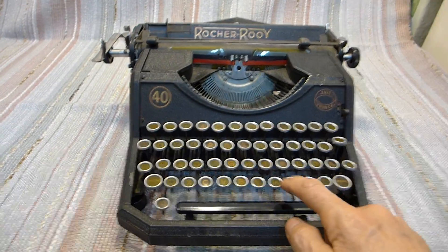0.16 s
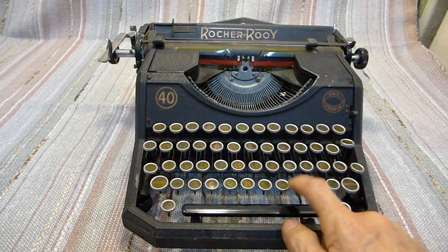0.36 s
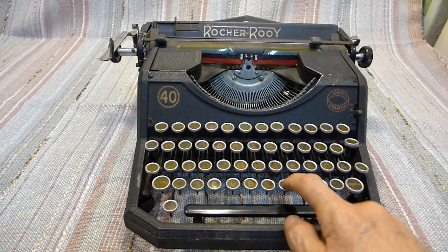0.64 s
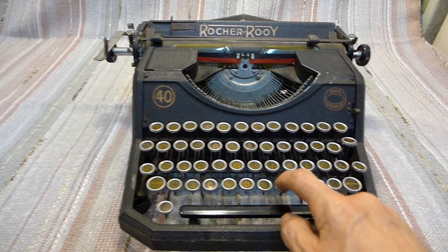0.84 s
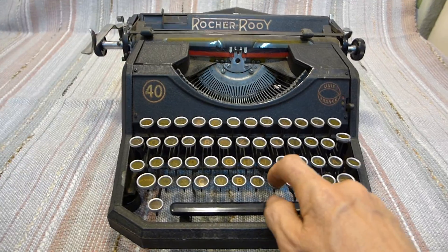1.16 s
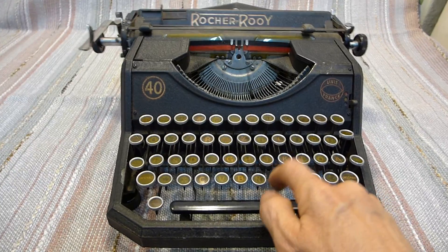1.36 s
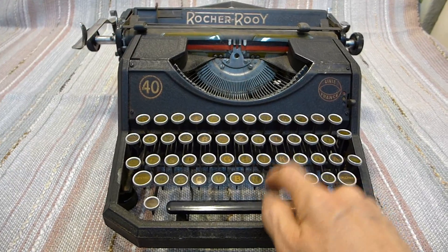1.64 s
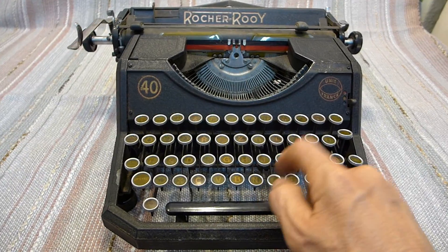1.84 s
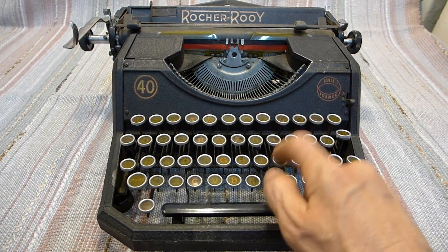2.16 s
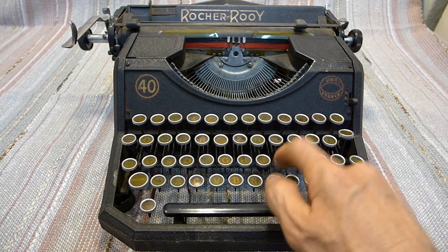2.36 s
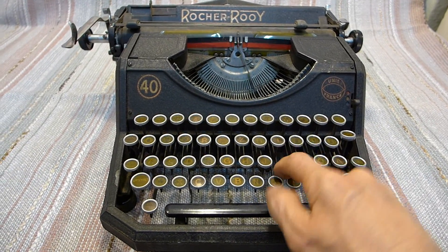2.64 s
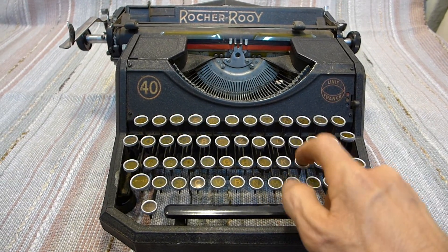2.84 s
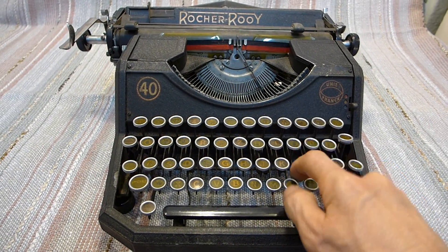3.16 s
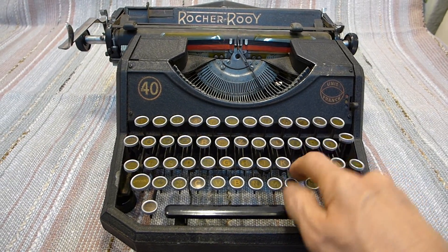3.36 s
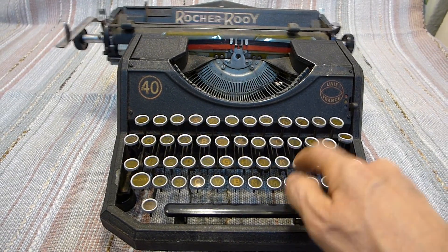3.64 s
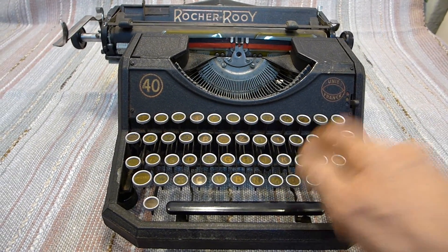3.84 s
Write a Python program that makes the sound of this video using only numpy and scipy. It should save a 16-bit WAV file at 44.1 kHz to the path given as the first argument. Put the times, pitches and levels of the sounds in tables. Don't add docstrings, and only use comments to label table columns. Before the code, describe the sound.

Typewriter keys struck one at a time, sharp metallic clacks and softer release clicks, three short bursts.

```python
import sys
import numpy as np
from scipy import signal
from scipy.fft import rfft, irfft
from scipy.io import wavfile
from scipy.ndimage import uniform_filter1d

SR = 44100
rng = np.random.default_rng(int(sys.argv[2]) if len(sys.argv) > 2 else 0)


def generate_wav(sig):
    pcm = np.round(np.clip(np.atleast_2d(sig).T, -1, 1) * 32767).astype(np.int16)
    wavfile.write(sys.argv[1], SR, pcm)


def gain_from_db(level_db):
    decades = np.asarray(level_db, float) / 20
    return 10 ** decades


N = 176400
WIDTH_DB = -25


def unit(x):
    return x / np.sqrt(np.mean(x ** 2))


def band(x, hz, width):
    return signal.lfilter(*signal.iirpeak(hz, hz / width, fs=SR), x)


def curve(points, hz):
    point_hz, point_db = np.transpose(points)
    return np.interp(np.log(hz), np.log(point_hz), point_db)


def walk(rate):
    k = int(SR / rate)
    steps = np.repeat(rng.standard_normal(N // k + 1), k)
    return unit(uniform_filter1d(uniform_filter1d(steps, k), k)[:N])


def swell(times, levels_db, rise, hold, t60):
    out = np.zeros(N)
    for start, db, fade in np.broadcast(times, levels_db, t60):
        end = min(int((start + rise + hold + 0.66 * fade) * SR), N)
        u = np.arange(int(start * SR), end)
        age = u / SR - start
        fall_db = 60 * np.maximum(age - rise - hold, 0) / fade
        out[u] += np.clip(age / rise, 0, 1) ** 2 * gain_from_db(db - fall_db)
    return out


# t/s, clatter level/dB, frame thump level/dB, slug lands after t/s, slap level/dB
STROKES = [
    (1.3295, -13, -21.5, 0.013, 2),
    (1.5247, -16, -25.5, 0.0044, -34),
    (1.711, -13.5, -24, 0.013, 3.5),
    (2.278, -15, -24, 0.0017, -34),
    (2.4609, -15.5, -25, 0.004, -38),
    (2.6613, -14.5, -23, 0.0047, -26),
    (3.2028, -12.5, -24.5, 0.01, 8),
    (3.388, -18, -27, 0.0049, -25),
    (3.5896, -14.5, -24, 0.0092, 6),
    (3.7779, -15.5, -24.5, 0.01, 5),
]
# escapement click t/s, level/dB, bar falls back after t/s, rattle level/dB, frame level/dB
RETURNS = [(1.4197, -16.5, 0.023, -32.5, -30.5), (1.6069, -17.5, 0.025, -30, -29.5),
           (1.8132, -18.5, 0.027, -37.5, -31.5), (2.359, -19.5, 0.026, -30.5, -29),
           (2.5562, -18.5, 0.021, -33, -29.5), (2.758, -19.5, 0.029, -29, -30.5),
           (3.285, -22, 0.027, -35, -35.5), (3.479, -19, 0.032, -31, -33.5),
           (3.688, -21, 0.031, -32.5, -31), (3.8629, -20.5, 0.023, -34.5, -36)]
# t/s, level/dB, frame level/dB, t60/s
TICKS = [(.35, -49, -61, 0.25), (0.4202, -45, -40.5, 0.037), (.438, -46.5, -44, 0.09),
         (1.3056, -37.5, -33.5, 0.2), (1.412, -34, -36, .08), (1.515, -38, -43, 0.23),
         (1.5973, -33.5, -43, 0.092), (1.6504, -42, -60, 0.068), (1.6814, -28.5, -36.5, 0.1),
         (1.861, -37, -53, 0.037), (2.044, -53, -51, 0.073), (2.062, -46, -65, 0.039),
         (2.1477, -46, -55, 0.12), (2.1687, -46.5, -53, 0.13), (2.2394, -33.5, -36, 0.087),
         (2.255, -32.5, -51, 0.33), (2.441, -32.5, -38.5, 0.14), (2.545, -37, -39, 0.11),
         (2.5981, -26.5, -34, 0.035), (2.6327, -36, -41, 0.16), (2.75, -38.5, -39, 0.13),
         (2.864, -46, -50, 0.25), (2.9427, -44.5, -46, 0.057), (2.9834, -50.5, -59, 0.34),
         (3.0963, -41, -44, 0.19), (3.17, -33.5, -41, 0.39), (3.359, -32, -43, 0.28),
         (3.469, -35, -37, 0.18), (3.562, -32.5, -39.5, 0.07), (3.9022, -33.5, -46, 0.1),
         (1.6335, -40, -45, 0.041), (1.803, -38, -40, .1), (1.8417, -33.5, -50, 0.04), (2.35, -43, -45, .1),
         (2.387, -39, -44, 0.03), (3.274, -45, -45, .1), (3.311, -45, -45, 0.029), (3.33, -32, -45, 0.073),
         (3.676, -38, -37, .12), (3.738, -42, -54, 0.099), (3.853, -40, -42, .1), (3.892, -46, -35, 0.036),
         (3.992, -47, -58, .05)]
# f/Hz, width f/Hz, clatter level/dB, escapement level/dB, rattle level/dB
STEEL = [(1910, 1260, -5.5, -13, 0), (2980, 800, -8, -18.5, -2.5), (3313, 510, -4, -10.5, -5.5),
         (4060, 380, -0.5, -8.5, -1.5), (4670, 300, -1, -8.5, -5), (5350, 1160, 2.5, -5.5, 2),
         (7030, 990, -6, -13, -4.5), (8500, 1900, -10.5, -42, -4), (8430, 380, -5.5, -9.5, -29),
         (9730, 3900, 4, -3, -7.5), (11700, 3200, -1.5, -12, -5), (13700, 2600, -13.5, -18, -15)]
# f/Hz, width f/Hz, thump level/dB, rattle level/dB
FRAME = [(68.4, 46, -57, -5), (124.7, 35, -13, -4), (240, 87, -8, 1.5), (333, 230, 2, -11.5),
         (405, 26, -3, -7.5), (510, 30.7, -9.5, -1.5), (619, 165, 3, -2.5), (1030, 285, 5.5, -0.5),
         (1193, 160, -3, -8)]


def typewriter():
    stroke_s, clatter_db, thump_db, _, _ = np.transpose(STROKES)
    click_s, click_db, fall_after, rattle_db, frame_db = np.transpose(RETURNS)
    tick_s, tick_db, tick_frame_db, tick_t60 = np.transpose(TICKS)
    escape_shape = dict(rise=0.00059, hold=0.0054, t60=0.056)
    fall_shape = dict(rise=0.018, hold=0.012, t60=0.2)
    fall_s = click_s + fall_after - 0.018

    clatter = swell(stroke_s, clatter_db, rise=0.0022, hold=0.0035, t60=0.05)

    rattle = swell(stroke_s, clatter_db - 19, rise=0.0081, hold=0.0094, t60=0.45)
    rattle += swell(fall_s, rattle_db, **fall_shape)
    rattle *= gain_from_db(2.2 * walk(250))
    rattle += swell(stroke_s - 0.01, clatter_db - 21, rise=0.01, hold=0.001, t60=0.015)
    rattle += swell(tick_s, tick_db, rise=0.00099, hold=0.00053, t60=tick_t60)

    escape = swell(click_s, click_db, **escape_shape)
    escape += swell(tick_s, tick_db - 3, rise=0.00099, hold=0.00077, t60=0.019)

    thump = swell(stroke_s, thump_db - 6, rise=0.00347, hold=0.0096, t60=0.13)
    knock = swell(fall_s, frame_db, **fall_shape)
    knock += swell(tick_s, tick_frame_db, rise=0.0012, hold=0.0029, t60=1.98 * tick_t60)
    knock += swell(click_s, click_db - 17, **escape_shape)

    steel = ring(STEEL, (clatter, escape, rattle))
    frame = ring(FRAME, (thump, knock))
    return steel + frame + slug_slaps() + key_thuds() + steel_pings() + frame_rings()


def clicks():
    hit = rng.random(N) < 5000 / SR
    uneven_db = 2 * np.minimum(rng.exponential(size=N), 2.0)
    return unit(hit * rng.standard_normal(N) * gain_from_db(uneven_db))


# f/Hz, side against mid level/dB
SPREAD = [(200, -22), (380, -20), (1290, -8), (2380, -15), (4400, -13), (9000, -10)]


def ring(modes, drives):
    out = np.zeros((2, N))
    for hz, width, *levels_db in modes:
        drive = sum(gain_from_db(db) * movement for db, movement in zip(levels_db, drives))
        drive = drive * np.sqrt(SR / width) * 0.19
        knocks = clicks() * gain_from_db(1.36 * walk(120))
        side = np.roll(knocks, N // 3) * gain_from_db(curve(SPREAD, hz))
        both = np.array([knocks, side]) * drive
        out += band(band(both, hz, 1.47 * width), hz, 1.47 * width)
    return out


def blow(modes, rise):
    u = np.arange(int(0.1 * SR)) / SR
    out = np.zeros(len(u))
    for hz, db, t60 in modes:
        level_luck, pitch_luck = rng.standard_normal(2)
        tone = np.sin(2 * np.pi * hz * (1 + 0.015 * pitch_luck) * u)
        out += gain_from_db(db + 1.6 * level_luck - 60 * u / t60) * tone
    return out * (1 - np.exp(-u / rise))


def add_at(out, start, sound):
    i = int(start * SR)
    out[0, i:i + len(sound)] += sound


# f/Hz, level/dB, t60/s
PLATEN = [(2720, -3, .006), (3200, 0, .005), (4100, -3, .007), (4900, -5, .004), (5650, 2, .0045),
          (7050, -6, .004), (7900, -9, .004)]


def slug_slaps():
    out = np.zeros((2, N))
    highpass = signal.butter(4, 2300, "high", fs=SR, output="sos")
    for start, _, _, after, db in STROKES:
        slap = signal.sosfilt(highpass, blow(PLATEN, rise=0.00035))
        add_at(out, start + after, gain_from_db(db - 4.0) * slap)
        add_at(out, start + after + 0.0039, gain_from_db(db - 15) * slap)
    out[1] = gain_from_db(WIDTH_DB) * band(out[0], 7000, 7900)
    return out


# f/Hz, level/dB, t60/s
THUD = [(245, -8, .05), (320, 1, .02), (420, 1, .02)]


def key_thuds():
    out = np.zeros((2, N))
    for start, _, thump_db, _, _ in STROKES:
        thud = gain_from_db(thump_db + 3) * band(blow(THUD, rise=0.001), 303, 420)
        add_at(out, start + 0.00347, thud)
        add_at(out, start + 0.00347 + 0.017, gain_from_db(-7.5) * thud)
    out[1] = gain_from_db(WIDTH_DB) * band(out[0], 7000, 7900)
    return out


def decaying_tones(rows, rise):
    out = np.zeros((2, N + SR))
    u = np.arange(SR // 4) / SR
    for start, hz, db, t60 in rows:
        tone = gain_from_db(db - 60 * u / t60) * np.sin(2 * np.pi * hz * u)
        add_at(out, start, tone * (1 - np.exp(-u / rise)))
    out[1] = gain_from_db(WIDTH_DB) * out[0]
    return out[:, :N]


# t/s, f/Hz, level/dB, t60/s
PINGS = [(.4225, 4300, -41, 0.033), (0.4398, 3120, -44, 0.065), (.4395, 4280, -42, .04),
         (1.3182, 5600, -28, 0.025), (1.461, 7200, -28, 0.027), (1.6504, 7220, -21, 0.027),
         (1.739, 6700, -22, 0.025), (1.861, 7100, -30, 0.042), (2.761, 4530, -31, 0.082),
         (3.228, 6560, -13, 0.014), (3.535, 3980, -28, .06), (.351, 5400, -47, 0.037),
         (.359, 5320, -45, .04), (1.4215, 8260, -23, .04), (1.8145, 8100, -29, .035),
         (1.822, 5500, -28, .025), (1.822, 1160, -29, 0.025), (2.2825, 4190, -9, 0.023),
         (2.4645, 9750, -9, 0.019), (2.466, 3740, -19, 0.018), (3.361, 3870, -26, .03),
         (3.395, 4020, -17, .03), (3.694, 3970, -30, .04), (3.863, 5370, -28, .03),
         (3.906, 4000, -32, 0.053)]


def steel_pings():
    return decaying_tones(PINGS, rise=0.0009)


# t/s, f/Hz,
# level/dB, t60/s
BODY = [(1.334, 496, -22, .1), (1.334, 373, -24, 0.15), (1.45, 508, -34, 0.066), (1.53, 233, -32, 0.21),
        (1.545, 110, -43, 0.29), (1.64, 250, -36, .2), (1.64, 642, -33, 0.091), (1.716, 405, -25.5, 0.11),
        (1.73, 513, -41, .08), (1.85, 511, -39, 0.15), (1.97, 228.2, -43, .5), (2.05, 228, -42, 0.33),
        (2.283, 393, -28, 0.12), (2.295, 241, -32, 0.23), (2.3, 110, -40, .3), (2.475, 238, -32, 0.22),
        (2.48, 110, -41, 0.28), (2.665, 400, -25.5, 0.066), (2.67, 106, -38, 0.27), (2.68, 240, -35, 0.23),
        (3.207, 300, -23.5, 0.05), (3.205, 100, -33, 0.12), (3.395, 107, -40.5, .35), (3.4, 243, -32, 0.17),
        (3.595, 247, -30, 0.18), (3.6, 111, -46, 0.48), (3.785, 246, -37.5, 0.24), (3.783, 110, -39, .15),
        (3.89, 635, -32, 0.089), (3.315, 640, -32, .08)]


def frame_rings():
    return decaying_tones(BODY, rise=0.0018)


def room_echo(near):
    t60, level_db = 0.16, -16
    u = np.arange(int(t60 * SR)) / SR
    echo = rng.standard_normal((2, len(u))) * gain_from_db(-60 * u / t60) * np.clip(u / 0.013, 0, 1)
    echo = signal.lfilter([1], [1, -0.35], echo)
    echo = echo / np.sqrt(np.sum(echo[0] ** 2)) * gain_from_db([[level_db], [level_db - 5.5]])
    return signal.fftconvolve(near[:1], echo, axes=1)[:, :N]


# f/Hz, level/dB
AIR = [(30, -2.5), (70, -31.5), (120, -13.5), (300, -12.5), (1500, -23.5), (3300, -33), (4600, -27.5),
       (15000, -49)]
# f/Hz, width f/Hz, level/dB
HUMS = [(214.6, 20.5, -52.5), (368.7, 31, -53), (168.7, 18, -56), (929, 82, -61), (1132, 135, -60)]
# t/s, level/dB
GAIN = [(0, 0), (.5, -1.5), (1.3, -2), (1.9, -4), (2.2, -6), (2.9, -4), (3.1, -8), (4, -3.5)]


def room_tone():
    hz = np.fft.rfftfreq(N, 1 / SR) + 1
    air = irfft(rfft(rng.standard_normal((2, N))) * gain_from_db(curve(AIR, hz)), N)
    out = unit(air) * gain_from_db(-46.5 + 1.0 * walk(7.67))
    for f, width, db in HUMS:
        hum = band(band(rng.standard_normal(N), f, width), f, width)
        out[0] += unit(hum) * gain_from_db(db + 2.0 * walk(5.75))
    out[1] = gain_from_db(-3.0) * (out[1] - band(out[1], 193, 520))
    gain_s, gain_db = np.transpose(GAIN)
    return out * gain_from_db(np.interp(np.arange(N) / SR, gain_s, gain_db))


def scene():
    near = typewriter()
    mid, side = near + room_echo(near) + room_tone()
    pan_db = 0.6
    return np.array([(mid + side) * gain_from_db(pan_db / 2), (mid - side) * gain_from_db(-pan_db / 2)])


def band_limit(x):
    return signal.sosfilt(signal.butter(12, 16410, fs=SR, output="sos"), x)


def record(dry):
    top_cut = signal.ellip(6, 0.5, 32, 15200, fs=SR, output="sos")
    bass_cut = signal.butter(2, 102.6, "high", fs=SR, output="sos")
    heard = signal.sosfilt(bass_cut, signal.sosfilt(top_cut, dry)) - 0.003
    mix = np.clip(heard, -1, 1)
    return band_limit(mix)


dry = scene()
out = record(dry)
generate_wav(out)
```